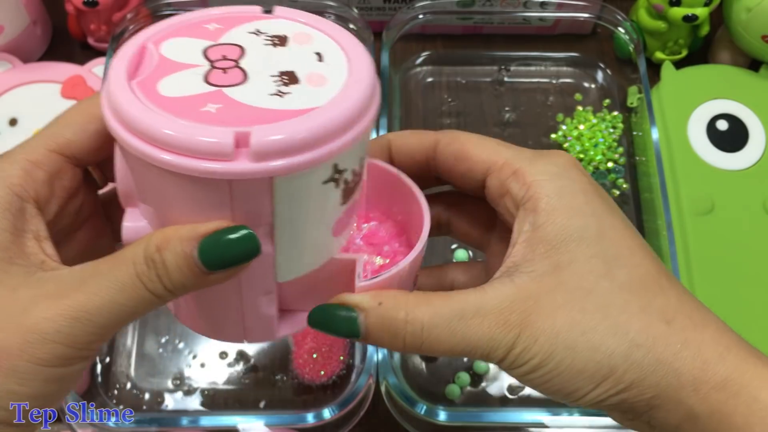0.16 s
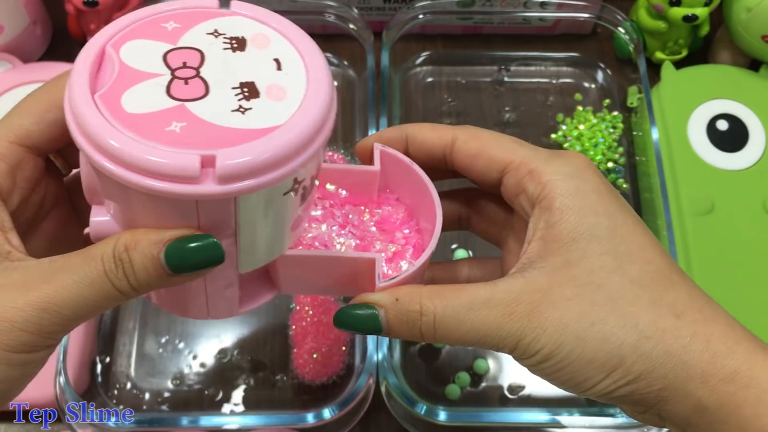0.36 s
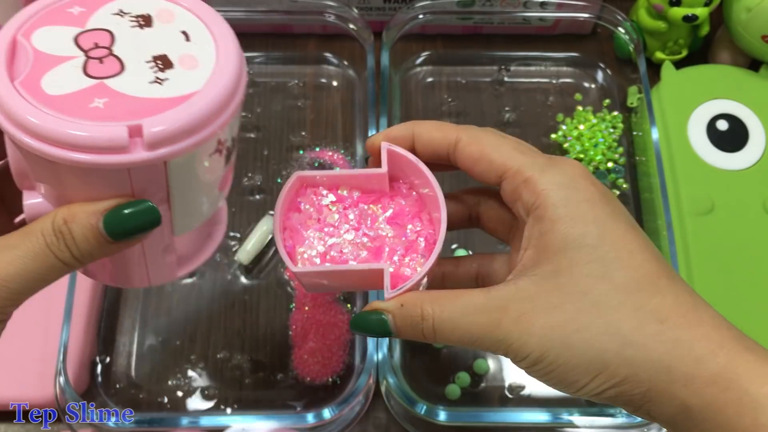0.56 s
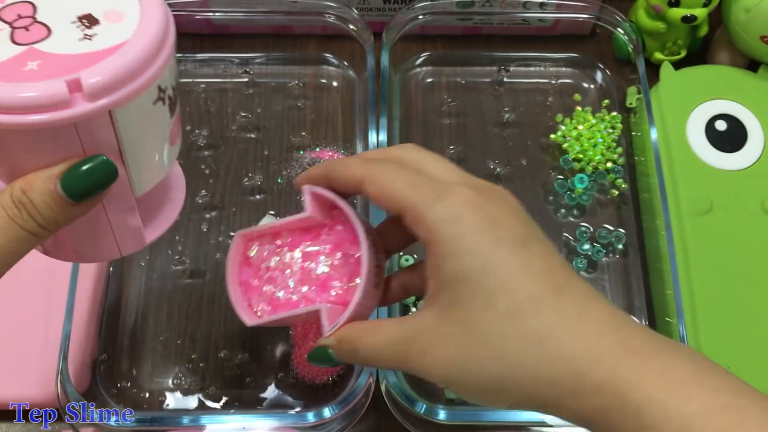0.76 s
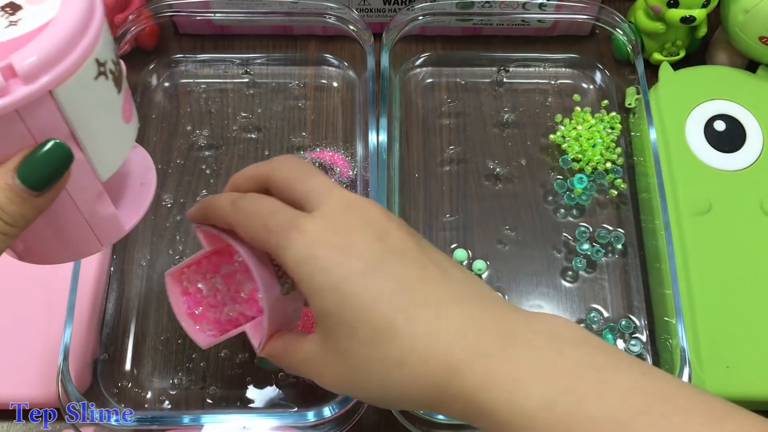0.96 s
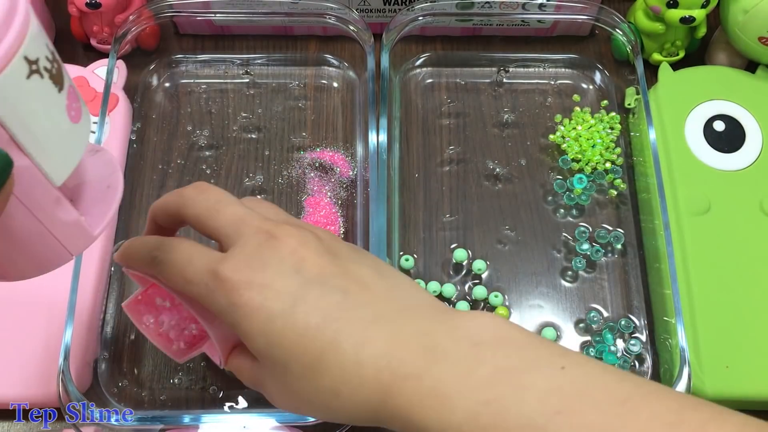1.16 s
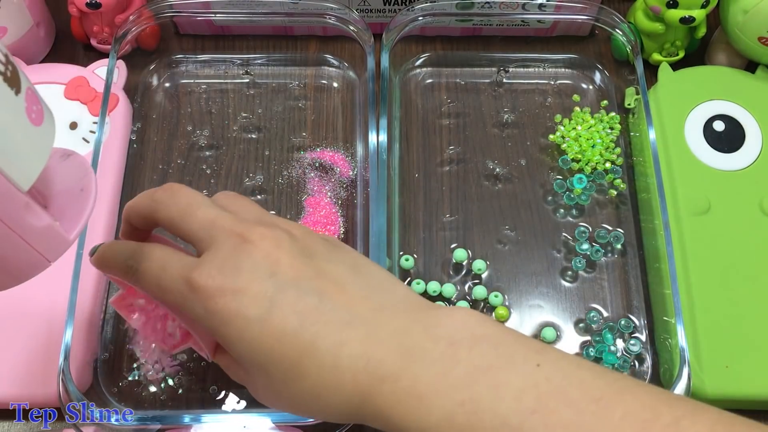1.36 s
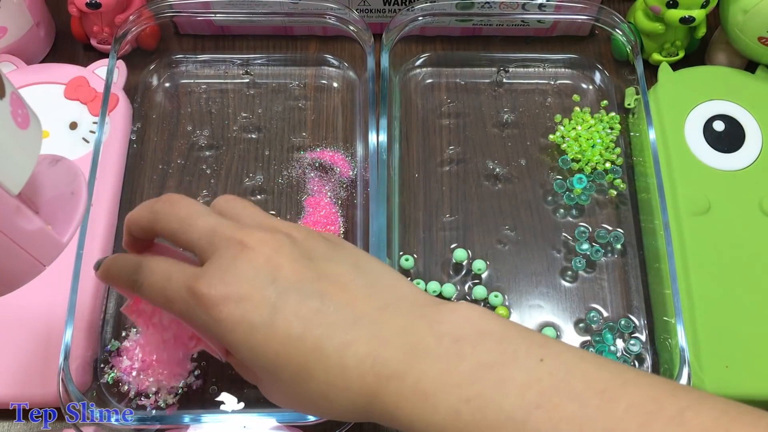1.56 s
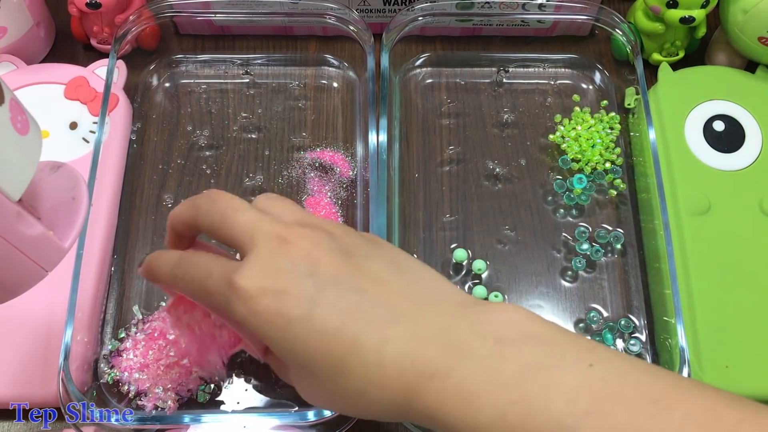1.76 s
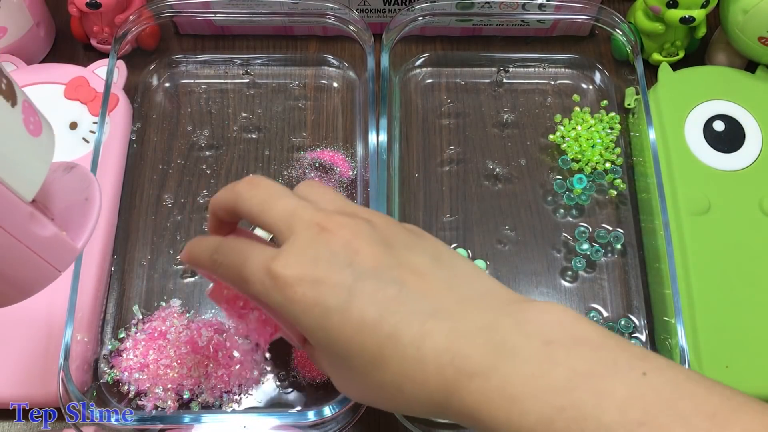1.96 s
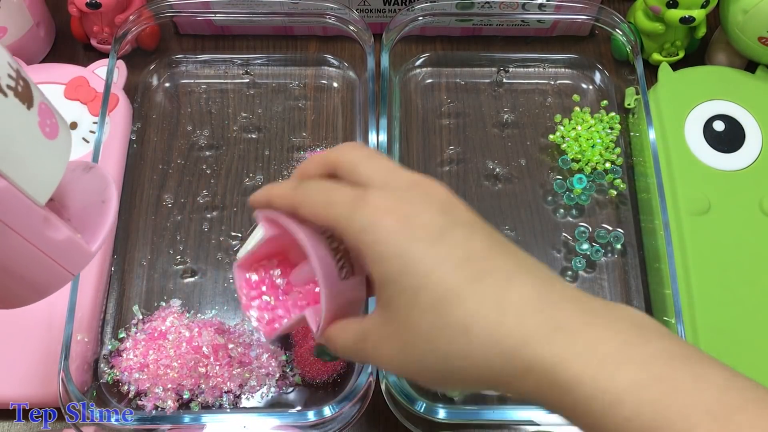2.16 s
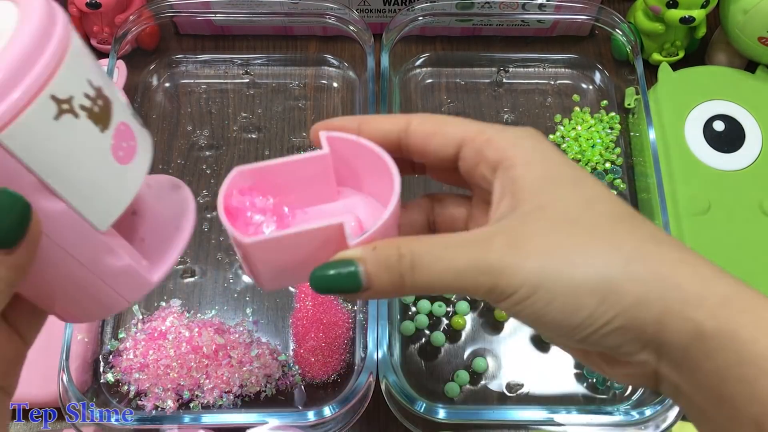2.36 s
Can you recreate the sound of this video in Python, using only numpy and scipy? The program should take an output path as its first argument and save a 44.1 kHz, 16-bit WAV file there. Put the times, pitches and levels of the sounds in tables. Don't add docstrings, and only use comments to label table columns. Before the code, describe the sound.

Sharp plastic click and knock of a toy drawer pulled open, then faint glitter pouring into a dish

```python
import sys
import numpy as np
from scipy import signal
from scipy.fft import rfft, irfft, next_fast_len
from scipy.io import wavfile
from scipy.ndimage import map_coordinates

SR = 44100
rng = np.random.default_rng(int(sys.argv[2]) if len(sys.argv) > 2 else 0)


def field_ratio(decibels):
    return 10 ** (np.asarray(decibels, dtype=float) / 20)


def dump_mix(stems):
    frames = np.atleast_2d(stems).T
    limited = np.clip(frames, -1, 1)
    pcm = np.round(limited * 32767).astype(np.int16)
    wavfile.write(sys.argv[1], SR, pcm)


N = 105840

# (frequency [Hz], density [dB per Hz])
HISS_SPECTRUM = [(120, -13.5), (200, -7.5), (450, -16), (700, -21), (2000, -24.5), (5000, -27.5),
                 (11000, -29.5), (15500, -32.5)]
# (frequency [Hz], width [Hz], level [dB])
HUM_MODES = [(51.7, 11, -8), (65, 4.6, 1.5), (91.6, 8, -3), (110.7, 36, -12), (183, 14, -13),
             (210, 23, -24)]
# (frequency [Hz], level [dB rms])
MOTOR_TONES = [(64, -63), (94, -66.5)]
# (frequency [Hz], t60 [s])
ROOM_DECAY = [(500, .22), (1500, 0.71), (3000, .6), (6500, .6), (10000, 0.52), (13000, 0.28), (16000, 0.12)]

# (time [s], level [dB])
TAP_BLOWS = [
    (.0037, -32.5),
]
# (frequency [Hz], level [dB], t60 [s])
TAP_MODES = [(960, -8, 0.021), (1540, 5, 0.0052), (2020, 6, 0.0062), (2600, 0, 0.0059), (3210, -11.5, 0.03),
             (4600, -19.5, 0.018), (6050, -23.5, 0.032)]
# (frequency [Hz], width [Hz], level [dB])
TAP_FAR_PEAKS = [(1000, 300, -2.5), (1500, 500, -1.5), (2200, 900, 0.5), (3500, 1800, -10),
                 (6500, 2000, -17.5)]

# (time [s], effort [dB])
SLIDE_TO_CATCH = [(.105, -93.5), (.115, -67), (.135, -58.5), (.16, -61), (.175, -55), (.2, -53.5),
                  (.235, -50.5), (.245, -59), (.26, -87)]
# (time [s], effort [dB])
SLIDE_PAST_CATCH = [(.24, -92), (.25, -46.5), (.3, -50.5), (.35, -52.5), (.39, -59), (.405, -63.5),
                    (.45, -67.5), (.47, -75)]
# (time [s], effort [dB])
SLIDE_FREE = [(.42, -74.5), (.45, -59), (.475, -55), (.5, -55), (.516, -50.5), (.535, -64.5), (.545, -50),
              (.555, -73)]
# (frequency [Hz], width [Hz], level [dB])
RUB_TO_CATCH = [(1160, 170, -3.5), (1820, 530, -16), (2570, 640, -9), (3930, 520, -14), (6000, 460, -4.5),
                (9800, 1200, -14), (13600, 3000, -14.5)]
# (frequency [Hz], width [Hz], level [dB])
RUB_PAST_CATCH = [(1080, 400, -5.5), (4100, 3200, -3.5), (7500, 2900, 2.5), (10600, 3400, -2),
                  (14000, 3000, -2.5)]
# (frequency [Hz], width [Hz], level [dB])
RUB_FREE = [(1190, 400, -8.5), (2410, 500, 0), (4040, 3900, -12), (6400, 810, -10.5), (10095, 2500, -20.5),
            (12300, 1000, -19.5), (14700, 1000, -15)]
# (time [s], level [dB])
OUT_CATCHES = [(.116, -60), (.1342, -47), (.173, -53.5), (.179, -53), (.188, -52.5), (.197, -51),
               (.203, -50), (.217, -52)]
# (time [s], level [dB])
FREE_CATCHES = [(.475, -50), (.49, -53), (.5152, -46.5), (.522, -48), (.531, -58.5)]
# (frequency [Hz], level [dB], t60 [s])
OUT_RUNNER = [(1000, -3.5, 0.067), (1260, -4, .03)]
# (frequency [Hz], level [dB], t60 [s])
FREE_RUNNER = [(2080, 7, 0.026), (2430, -2, .04), (1240, -5, .025)]

# (time [s], level [dB])
CATCH_SLIPS = [
    (.2293, -48),
    (.2368, -22),
]
# (frequency [Hz], level [dB], t60 [s])
SLIP_MODES = [(6550, 2, .008), (1200, -8.5, 0.0076), (8000, -11, 0.014), (10500, -10, 0.0091),
              (13020, -11.5, .005), (3821, -17, 0.0039)]
# (time [s], level [dB])
SCUFF_BLOWS = [
    (.2312, -40),
]
# (frequency [Hz], level [dB], t60 [s])
SCUFF_MODES = [(2300, -2.4, 0.0045), (3400, 0, .008), (4383, -2, 0.011)]
# (time [s], level [dB])
SNAP_BLOWS = [
    (.2412, 2),
]
# (frequency [Hz], level [dB], t60 [s])
SNAP_MODES = [(6538, -2, 0.0081), (6297, -4, .01), (6724, -5, .009), (7250, -12, .0085), (3566, -6.5, .007),
              (4590, -10.5, .0069), (4992, -11, .008), (9013, -7, .01), (12335, -16, .011),
              (9755, -16.5, 0.0039), (10750, -16, .008), (14140, -15.5, 0.006956)]
# (time [s], level [dB])
CASE_HITS = [
    (.2421, -10),
    (.2452, -16),
]
# (frequency [Hz], level [dB], t60 [s])
CASE_MODES = [(1027.8, -7.5, 0.015), (1300, -11, 0.015), (1730, -1.5, .014), (2470, -8.5, 0.054),
              (2100, -13, .014), (3135, -11, 0.03)]
# (frequency [Hz], width [Hz], level [dB])
SNAP_FAR_PEAKS = [(1040, 130, -5.5), (1660, 140, -3), (2290, 420, -0.5), (3960, 2300, -8), (6374, 800, 1.5),
                  (8650, 910, -5), (10200, 1800, -8), (13700, 3500, -12)]
# (time [s], level [dB])
EDGE_CREAKS = [
    (.3443, -33),
    (.3865, -48),
]
# (frequency [Hz], level [dB], t60 [s])
EDGE_MODES = [(9300, 0, .007), (10100, -2, .014), (11300, -3, .006), (12700, -1, .007), (14500, -7, .007),
              (15500, -7, .006), (4300, -12, .01)]

# (time [s], level [dB])
KNOCK_BLOWS = [
    (.5499, -12),
]
# (frequency [Hz], level [dB], t60 [s])
RIM_MODES = [(3460, -11, .01), (4250, -14.5, 0.0047), (4890, -6, .01), (5980, 2.5, 0.0052),
             (6400, -0.5, 0.012), (7090, -6, 0.012), (7900, -15.5, 0.0036), (8940, -13, 0.0063),
             (9700, -20, 0.033), (10920, -18, 0.0031), (12130, -14, .007), (13700, -13, 0.0052),
             (13900, -15, .007), (14900, -20.5, .005)]
# (frequency [Hz], level [dB], t60 [s])
PING_MODES = [(9745, -53, .6), (9772, -57, .45), (9715, -58, .4)]
# (time [s], level [dB])
TRAY_HITS = [
    (.5481, -40),
    (.5503, -13),
]
# (frequency [Hz], level [dB], t60 [s])
TRAY_MODES = [(1430, -5, .022), (1758, -3, 0.011), (1156, -24, 0.075), (2353, -19, 0.022),
              (2510, 6, 0.0048), (3037, -21.5, 0.015)]
# (time [s], level [dB])
TRAY_REBOUNDS = [
    (.5622, -34),
    (.5644, -33),
    (.569, -44),
]
# (frequency [Hz], level [dB], t60 [s])
WALL_MODES = [(1810, 0, .02), (1400, -7, 0.012), (7000, -5.5, .015)]
# (frequency [Hz], width [Hz], level [dB])
KNOCK_FAR_PEAKS = [(1370, 200, -4), (1850, 140, -3), (2670, 170, -0.5), (4100, 670, -12.5), (6040, 490, -8),
                   (6980, 570, -10), (8500, 1500, -16.5), (10400, 4300, -20), (13500, 2400, -18.5)]
BLOW_ROOM_DB = [
    0,
    -10,
    -30,
]

# (time [s], level [dB])
CASE_THUMPS = [
    (.2425, -41.5),
    (.5505, -46),
]
# (frequency [Hz], level [dB], t60 [s])
THUMP_MODES = [(367, -0.5, 0.039), (506.9, -1, 0.014), (720, -3.5, 0.0047)]
# (time [s], level [dB])
HAND_NUDGES = [
    (.532, -51.5),
]
# (frequency [Hz], level [dB], t60 [s])
NUDGE_MODES = [(820, 0.0064, 0.037)]

# (time [s], level [dB])
FLAKE_TICKS = [(1.012, -64), (1.236, -63), (1.3235, -49.5), (1.341, -64), (1.3497, -54), (1.3512, -49),
               (1.3897, -56), (1.438, -64), (1.4832, -61), (1.4937, -58), (1.558, -58), (1.5825, -55),
               (2.0006, -58), (2.012, -61), (2.3363, -68), (2.3458, -63), (2.382, -66)]
# (frequency [Hz], level [dB], t60 [s])
FLAKE_MODES = [(9700, -1, .009), (10900, -3, .009), (12300, -4, .008), (13900, -1, .011), (15400, -5, .008),
               (6000, -11, .012), (4400, -12, .008), (2700, -9, .008)]
# (time [s], flow [dB])
POUR_FLOW = [(1.2, -90.5), (1.4, -68.5), (1.475, -71.5), (1.495, -62), (1.545, -63), (1.6, -58.5),
             (1.65, -63.5), (1.7, -64), (1.73, -58.5), (1.805, -61.5), (1.83, -67), (1.88, -65),
             (1.915, -61), (1.97, -63), (2.02, -69), (2.16, -70), (2.2, -78.5), (2.3, -79.5)]
# (frequency [Hz], width [Hz], level [dB])
HEAP_PEAKS = [(3750, 1010, -7.5), (6238, 710, -0.5), (7466, 1600, -2), (10000, 2200, -2)]
# (frequency [Hz], width [Hz], level [dB])
GLASS_PEAKS = [(11000, 2000, -4.5), (13300, 1900, 1), (15310, 1500, -1)]
# (time [s], glass over heap [dB])
POUR_AIM = [(1.2, -0.5), (1.45, 1), (1.52, -2.5), (1.59, 1), (1.64, -1.5), (1.72, 0), (1.79, 0),
            (1.86, -0.5), (1.93, 2), (2.02, 2), (2.1, -0.5), (2.3, 0.5)]

HISS_DB, HUM_DB = -66.5, -56.5
MOTOR_DRIFT = 0.92
RUB_PER_S, RUB_SPREAD_DB = 12000, 2.5
FLAKES_PER_S, FLAKE_SPREAD_DB = 14000, 2.0
BIGGEST = 3
DETUNE = 0.03
CRACK_DB, CRACK_S, RISE_S = -11, 0.009, 0.0002
RUB_ROOM_DB, FLAKE_ROOM_DB, TICK_ROOM_DB = -10, -11, -16
WALL_S = 0.002
BOUNCE_S, BOUNCE = 0.000345, 0.2
CASE_LOW_HZ, TRAY_LOW_HZ, EDGE_DAMP = 893, 1090, 1.05
BAND_HZ, MIC_TOP_HZ, MIC_STEEP = 15850, 15600, 44
CLIP_LEVEL, CLIP_LOW_HZ = 1.0, 900


def unit(x):
    return x / np.sqrt(np.mean(x ** 2) + 1e-20)


def along(points, hz):
    f, v = np.transpose(points)
    return np.interp(np.log(hz + 1), np.log(f + 1), v)


def level(rows):
    s, db = np.transpose(rows)
    return field_ratio(np.interp(np.arange(N) / SR, s, db, left=-120, right=-120))


def filtered(x, response):
    m = next_fast_len(N + SR // 2)
    return irfft(rfft(x, m) * response(np.fft.rfftfreq(m, 1 / SR)), m)[:N]


def steady(x):
    return filtered(x, lambda f: f < BAND_HZ)


def resonant(x, peaks, order=1):
    def response(f):
        total = 0
        for k, (hz, width, db) in enumerate(peaks):
            damping = 1j * f * width
            total = total + (-1) ** k * field_ratio(db) * (damping / (hz * hz - f * f + damping)) ** order
        return total
    return unit(filtered(x, response))


def grains(per_s, spread_db):
    present = rng.random(N) < per_s / SR
    size = np.minimum(rng.exponential(size=N), BIGGEST)
    return present * rng.standard_normal(N) * field_ratio(spread_db * size)


def hits(events, modes, scatter_db=0, crack_db=CRACK_DB, detune=0):
    out, t = np.zeros(N + SR), np.arange(SR // 2) / SR
    rise = 1 - np.exp(-t / RISE_S)
    for s, db in events:
        blow = field_ratio(crack_db - 60 * t / CRACK_S) * rng.standard_normal(len(t))
        for hz, mode_db, t60 in modes:
            decay = field_ratio(mode_db + rng.normal(0, scatter_db) - 60 * t / t60)
            pitch = hz * (1 + rng.normal(0, detune))
            blow = blow + decay * np.sin(2 * np.pi * pitch * t) * rise
        out[round(s * SR):][:len(t)] += field_ratio(db) * blow
    return out[:N]


def room(x):
    hz, t, z = signal.stft(rng.standard_normal(SR), SR, nperseg=256)
    decay = field_ratio(-60 * t / along(ROOM_DECAY, hz)[:, None])
    tail = signal.istft(z * decay, SR, nperseg=256)[1]
    tail = tail * (1 - np.exp(-np.arange(len(tail)) / SR / WALL_S))
    return steady(signal.fftconvolve(x, tail / np.linalg.norm(tail))[:N])


def far(blows, peaks, db):
    impulse = np.zeros(N)
    impulse[round(blows[0][0] * SR)] = 1
    return field_ratio(db) * room(resonant(impulse, peaks) / np.sqrt(N))


def small(x, low_hz):
    return filtered(x, lambda f: (-f * f / (low_hz ** 2 - f * f + 1j * f * low_hz * EDGE_DAMP)) ** 4)


def floor():
    hiss = unit(filtered(rng.standard_normal(N), lambda f: field_ratio(along(HISS_SPECTRUM, f)) * (f > 110)))
    t = np.arange(N) / SR
    motor = np.zeros(N)
    for hz, db in MOTOR_TONES:
        drift = MOTOR_DRIFT * map_coordinates(rng.standard_normal(12), [t * 4])
        motor += field_ratio(db) * np.sqrt(2) * np.sin(2 * np.pi * hz * t + drift)
    hum = resonant(rng.standard_normal(N), HUM_MODES, order=2)
    return steady(field_ratio(HISS_DB) * hiss + motor + field_ratio(HUM_DB - 3) * hum)


def finger_tap():
    return hits(TAP_BLOWS, TAP_MODES, crack_db=-26) + far(TAP_BLOWS, TAP_FAR_PEAKS, BLOW_ROOM_DB[2])


def slide():
    rub = np.zeros(N)
    for effort, peaks in ((SLIDE_TO_CATCH, RUB_TO_CATCH), (SLIDE_PAST_CATCH, RUB_PAST_CATCH),
                          (SLIDE_FREE, RUB_FREE)):
        rub += level(effort) * resonant(grains(RUB_PER_S, RUB_SPREAD_DB), peaks)
    rub += hits(OUT_CATCHES, OUT_RUNNER, crack_db=-36.5)
    rub += hits(FREE_CATCHES, FREE_RUNNER, crack_db=-45)
    return steady(rub) + field_ratio(RUB_ROOM_DB) * room(rub)


def catch_snap():
    tongue = hits(SCUFF_BLOWS, SCUFF_MODES) + hits(CATCH_SLIPS, SLIP_MODES) + hits(SNAP_BLOWS, SNAP_MODES)
    case = hits(CASE_HITS, CASE_MODES, crack_db=-31)
    edge = hits(EDGE_CREAKS, EDGE_MODES, crack_db=-4.5)
    return tongue + case + edge + far(SNAP_BLOWS, SNAP_FAR_PEAKS, BLOW_ROOM_DB[0])


def hand_jolts():
    return hits(CASE_THUMPS, THUMP_MODES, crack_db=-58.5) + hits(HAND_NUDGES, NUDGE_MODES, crack_db=-35.5)


def knock():
    rim = hits(KNOCK_BLOWS, RIM_MODES + PING_MODES, crack_db=-6)
    tray = hits(TRAY_HITS, TRAY_MODES, crack_db=-33.5)
    settling = hits(TRAY_REBOUNDS, WALL_MODES, crack_db=-24)
    return rim + tray + settling + far(KNOCK_BLOWS, KNOCK_FAR_PEAKS, BLOW_ROOM_DB[1])


def drawer():
    case = small(finger_tap() + slide() + catch_snap(), CASE_LOW_HZ)
    return case + hand_jolts() + small(knock(), TRAY_LOW_HZ)


def patter(peaks):
    return resonant(grains(FLAKES_PER_S, FLAKE_SPREAD_DB), peaks)


def glitter():
    ticks = steady(hits(FLAKE_TICKS, FLAKE_MODES, scatter_db=2, crack_db=-4, detune=DETUNE))
    landing = patter(HEAP_PEAKS) + level(POUR_AIM) * patter(GLASS_PEAKS)
    stream = steady(field_ratio(-3) * level(POUR_FLOW) * landing)
    return ticks + stream + room(field_ratio(TICK_ROOM_DB) * ticks + field_ratio(FLAKE_ROOM_DB) * stream)


def mic_top(f):
    return 1 / (1 + (f / MIC_TOP_HZ) ** MIC_STEEP)


def close_echo(f):
    return 1 - BOUNCE * np.exp(-2j * np.pi * f * BOUNCE_S)


def scene():
    background = floor()
    plastic = filtered(drawer(), lambda f: close_echo(f) * mic_top(f))
    return (background + plastic + filtered(glitter(), close_echo))[None]


def roll_off(x):
    return signal.sosfilt(signal.butter(12, 16400, fs=SR, output="sos"), x)


def record(dry):
    clipped = dry[0] / (1 + np.abs(dry[0] / CLIP_LEVEL) ** 10) ** (1 / 10)
    lost = filtered(clipped - dry[0], lambda f: mic_top(f) / (1 + (CLIP_LOW_HZ / (f + 1)) ** 4))
    return roll_off(dry + lost)


dry = scene()
out = record(dry)
dump_mix(out)
```